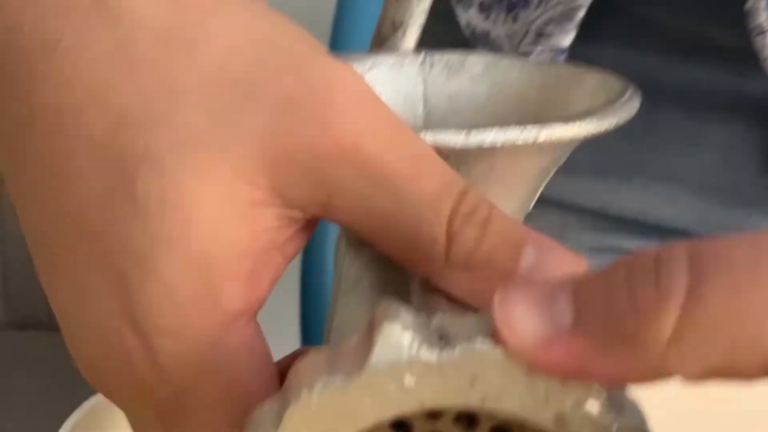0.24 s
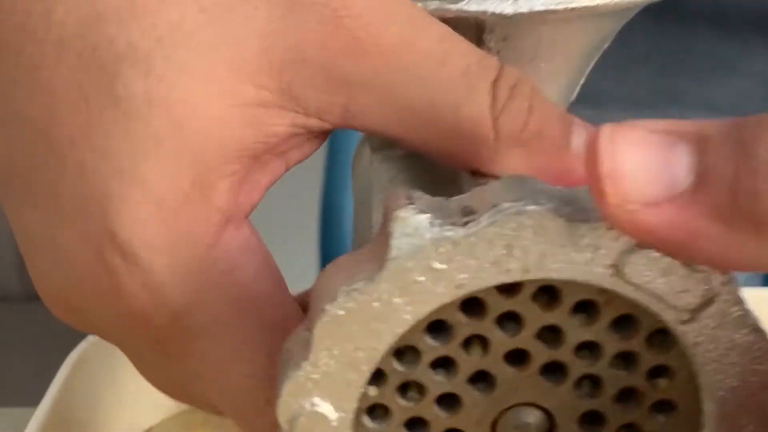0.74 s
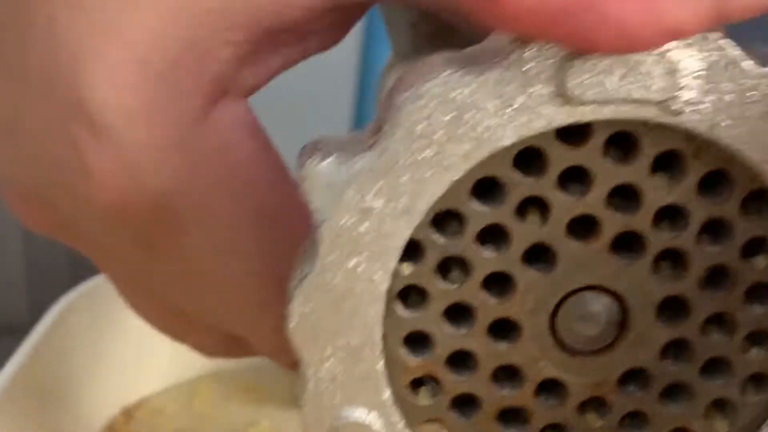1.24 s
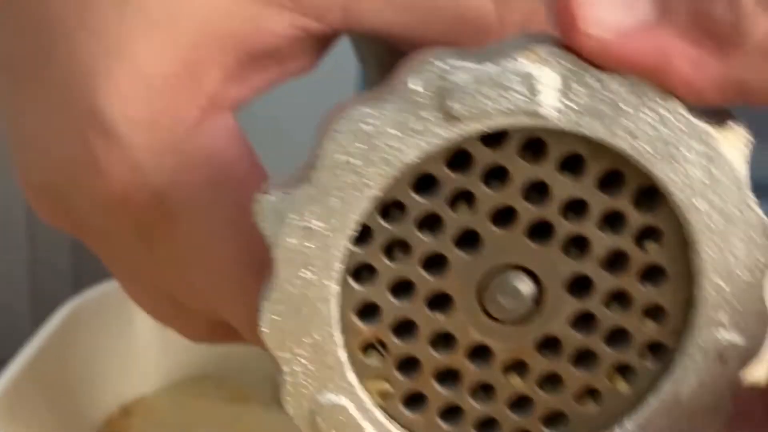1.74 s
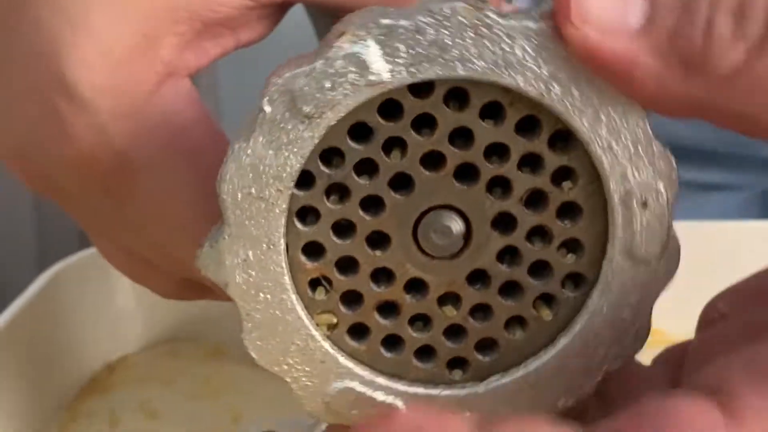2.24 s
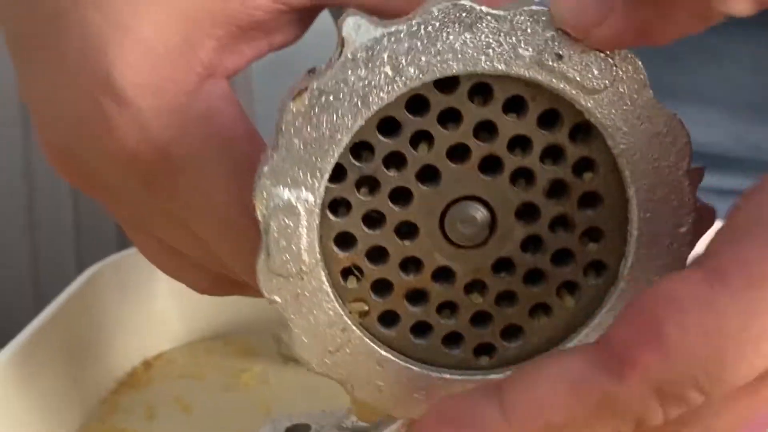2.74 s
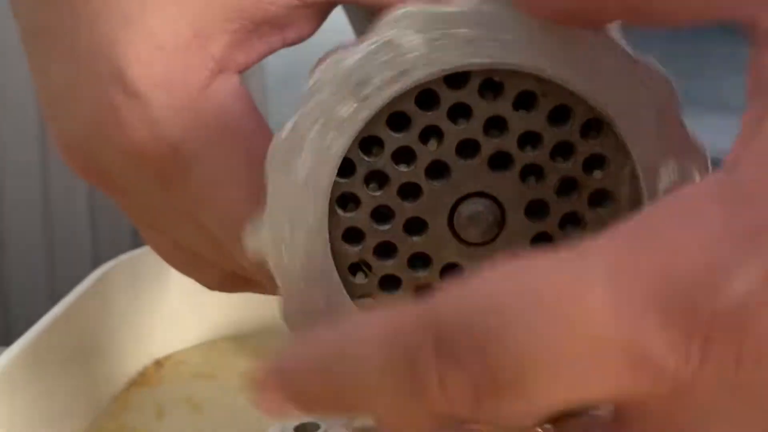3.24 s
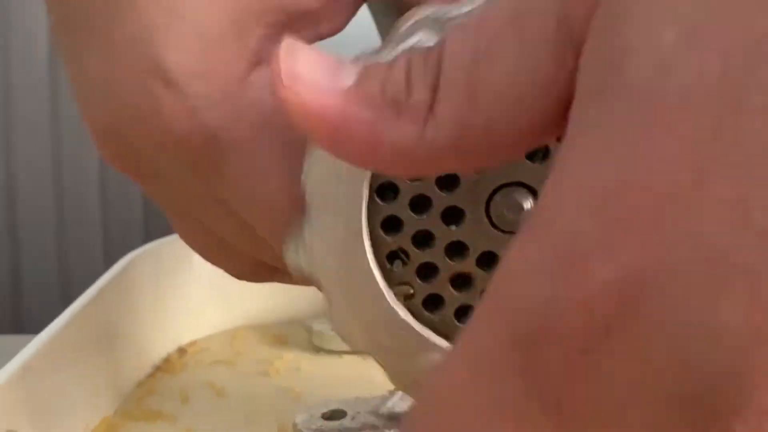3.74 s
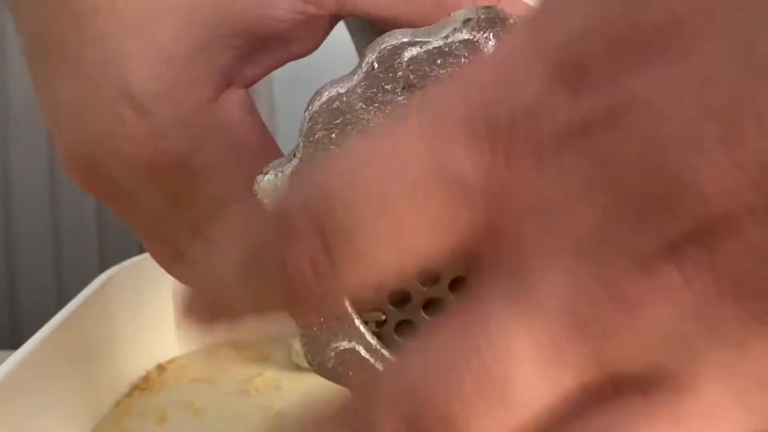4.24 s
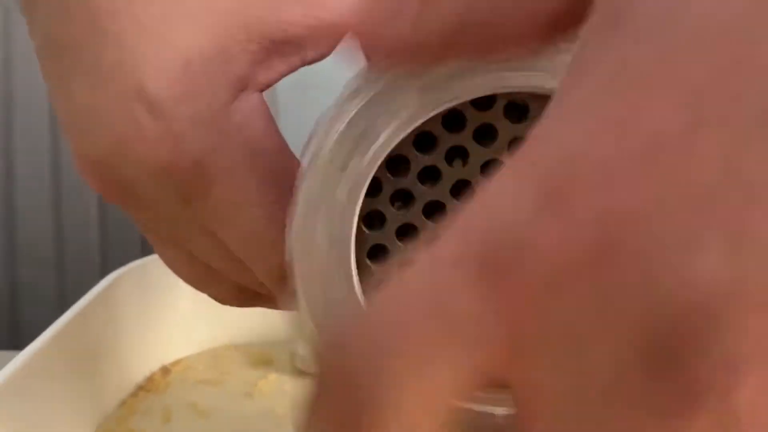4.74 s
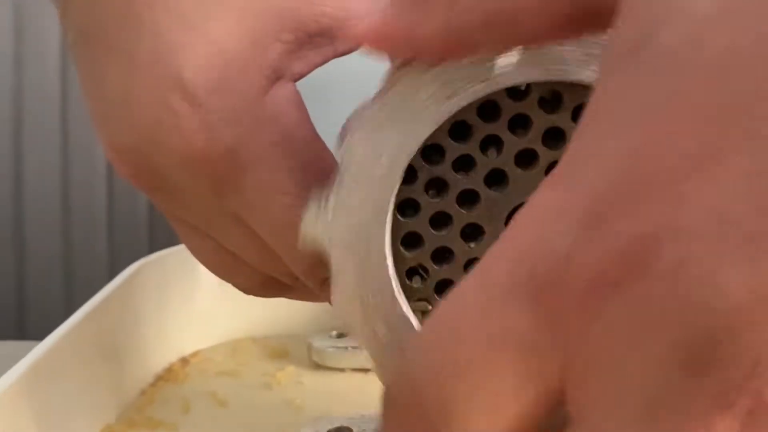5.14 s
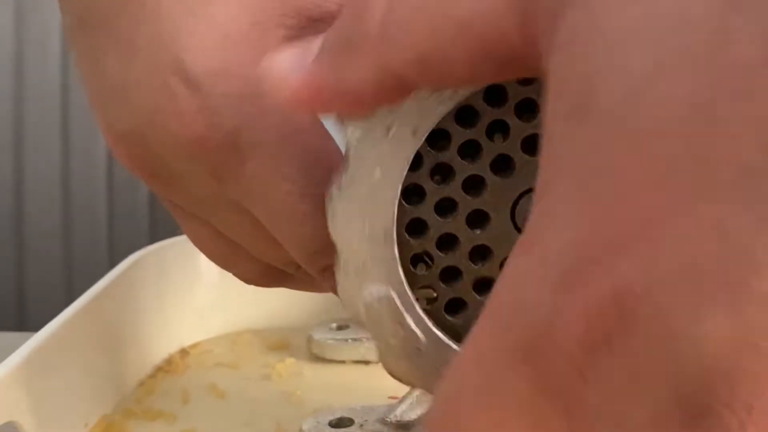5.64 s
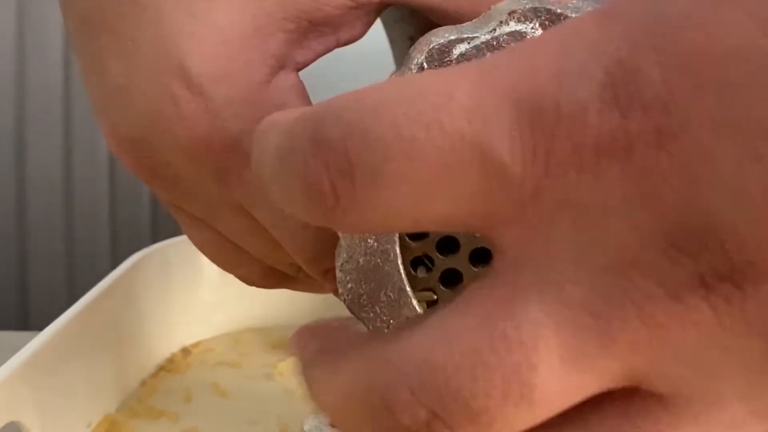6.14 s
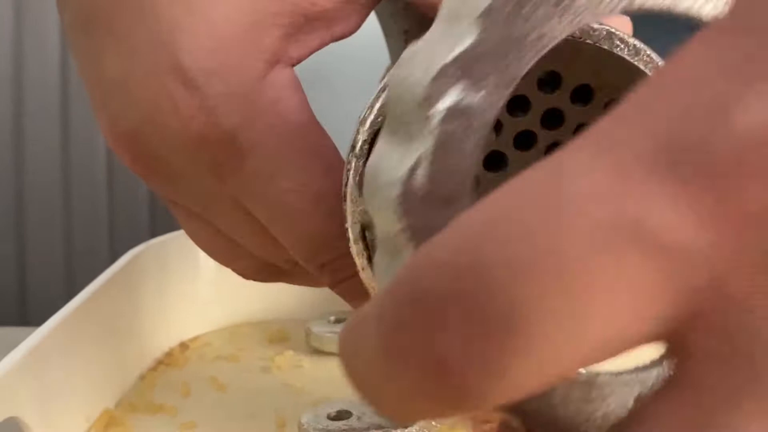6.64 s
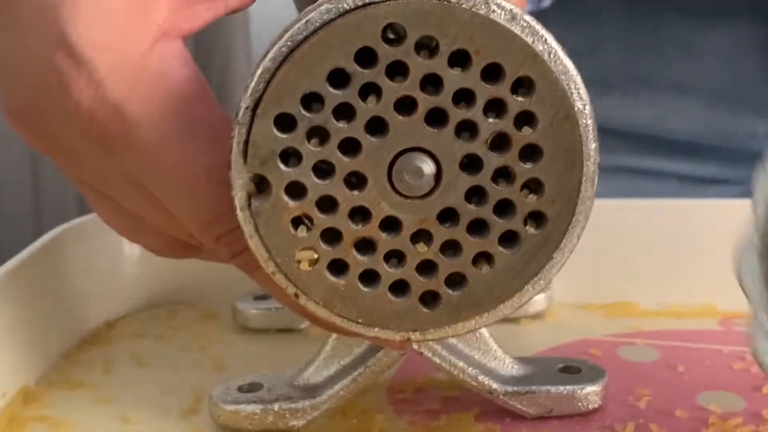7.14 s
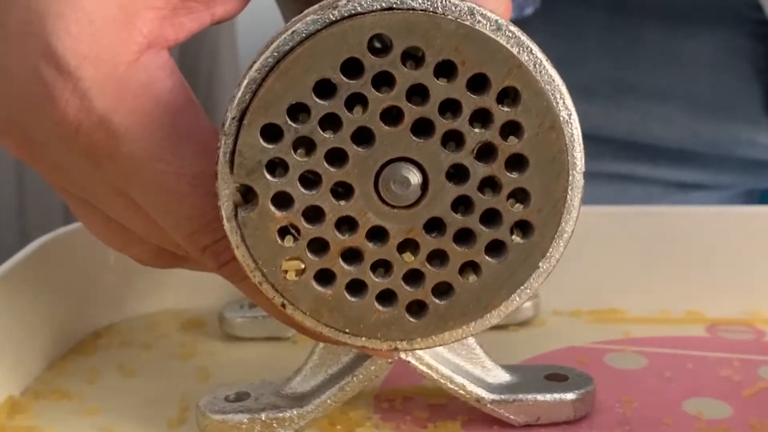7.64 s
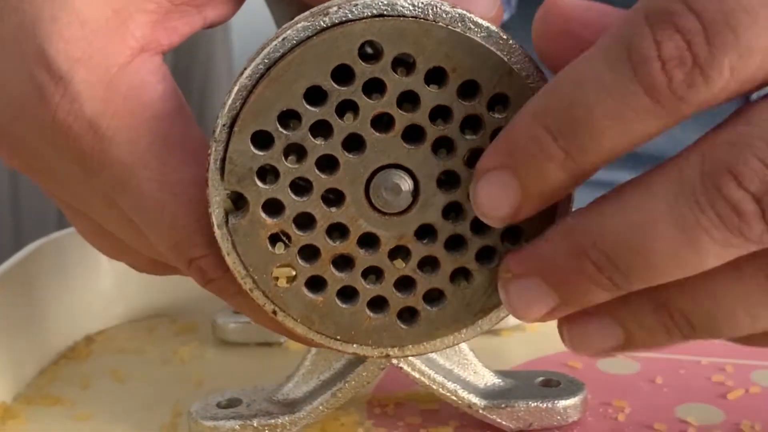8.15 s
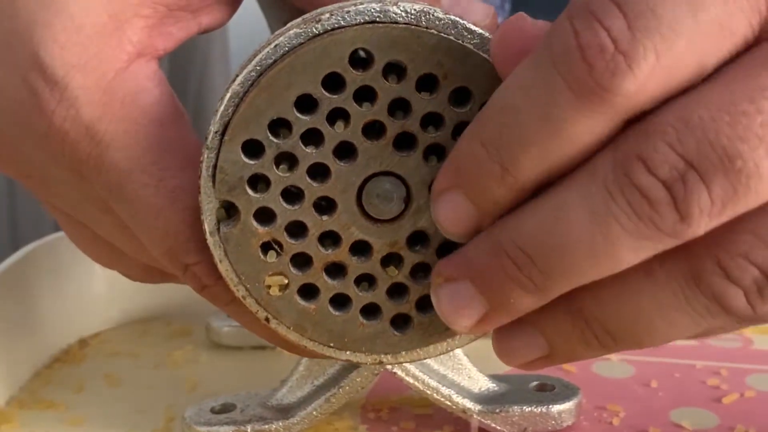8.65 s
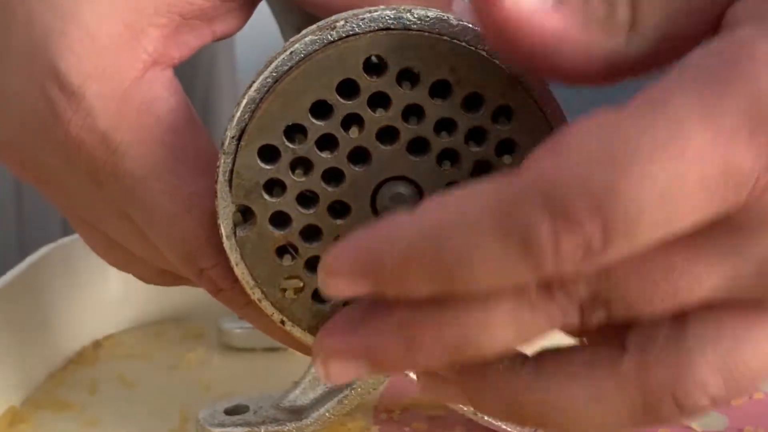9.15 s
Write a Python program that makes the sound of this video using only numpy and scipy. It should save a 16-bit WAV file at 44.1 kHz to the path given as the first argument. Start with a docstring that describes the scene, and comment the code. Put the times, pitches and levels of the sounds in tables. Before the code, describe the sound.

A hand-held cast-metal grinder is taken apart close to the microphone. One strong clank comes early, followed by irregular stick-slip scrapes with a low metallic groan, dusty hiss and crackling dry crumbs. After a last knock and a small run of ticks, the heavy ring drops onto the table in two loud clunks. Soft finger taps end it, with a short indoor room tail.

```python
"""The ring nut of a cast-metal hand meat grinder rasps on its gritty thread, close to the microphone in a
small room: each push of the hand drives stick-slip noise through resonances of thread and rim.
Loose parts knock as struck modes and dull thuds; dry pasta crumbs snap as short noise bursts.
The freed ring is put down on the table with two loud clunks, then fingers tap at the cutting plate.
A room tail and a quiet room tone surround it all."""
import sys
import numpy as np
from scipy import signal
from scipy.fft import rfft, irfft, next_fast_len
from scipy.io import wavfile

SR = 44100
rng = np.random.default_rng(int(sys.argv[2]) if len(sys.argv) > 2 else 0)


def unload_audio(sound):
    """Save the sound as a 16-bit wav file, at the path given as the first command line argument."""
    columns = np.transpose(np.atleast_2d(sound))
    # keep every value between -1 and 1, then stretch to whole-number steps
    steps = np.round(np.clip(columns, -1, 1) * 32767)
    wavfile.write(sys.argv[1], SR, steps.astype(np.int16))


N = 414540
TIME = np.arange(N) / SR
AGE = TIME[:SR // 3]  # time since a blow, s

# modes of the struck cast metal, low and high: f/Hz, level/dB, t60/s
HOUSING_MODES = [(520, -9, .04), (600, -5, .03), (676, 0, .05), (790, -4, .05), (890, -8, .035),
                 (1062, -9, .05), (1200, -14, .04), (1336, -15, .06)]
HOUSING_HIGH_MODES = [(1790, -1, .04), (1930, 0, .05), (2250, 0, .045), (2480, -3, .04), (2680, -8, .04),
                      (2930, -7, .04), (3400, -13, .04), (4560, -16, .06)]
# spectra of the dull clank, the bright clink and the top of a snap: f/Hz, level/dB
CLANK_SPECTRUM = [(120, -25), (250, -11.5), (450, -3.5), (650, -3), (1000, -2.5), (1500, -11.5),
                  (2500, -46.5)]
CLINK_SPECTRUM = [(700, -25.5), (1150, -5.5), (1700, -0.5), (2300, 3), (3200, -9), (4300, -17.5),
                  (6500, -21), (9000, -17), (12000, -27), (15000, -29)]
SNAP_TOP_SPECTRUM = [(4000, -21.5), (7000, -3.5), (9000, 1.5), (10400, 4), (11800, -5.5), (13500, 0),
                     (15300, -8), (16800, -19)]


def amp(db):
    """Decibels to gain."""
    return 10 ** (np.asarray(db) / 20)


def rms_one(x):
    """Scale to rms 1."""
    return x / np.sqrt(np.mean(x ** 2) + 1e-20)


def unit_blow(x):
    """Scale a blow to the energy of 20 ms at rms 1."""
    energy = np.mean(np.sum(x ** 2, axis=-1))
    return x / np.sqrt(energy / (.02 * SR))


def at_hz(points, hz, axis=1):
    """Read one column of a table on a log-frequency axis."""
    table = np.array(points)
    return np.interp(np.log(np.maximum(hz, 1)), np.log(table[:, 0]), table[:, axis])


def drift(rate):
    """Random wander of rms 1 with `rate` fresh values per second, joined by straight lines."""
    knots = rng.standard_normal(N // 40)
    return rms_one(np.interp(TIME * rate, np.arange(len(knots)), knots))


def colour(x, spectrum):
    """Give a sound a spectrum that falls 12 dB per octave beyond its end points."""
    size = next_fast_len(x.shape[-1])
    hz = np.maximum(np.arange(size // 2 + 1) * SR / size, 1)
    low_skirt = np.minimum(1, hz / spectrum[0][0]) ** 2
    high_skirt = np.minimum(1, spectrum[-1][0] / hz) ** 2
    shaped = rfft(x, size) * amp(at_hz(spectrum, hz)) * low_skirt * high_skirt
    return irfft(shaped, size)[..., :x.shape[-1]]


def stereo_noise(size):
    """White noise, most alike on both sides in the bass and unrelated in the treble."""
    # left-right likeness of the room: f/Hz, correlation
    likeness = [(30, 0.5), (150, 1), (400, 0.7), (1000, 0)]
    mid, side = rfft(rng.standard_normal((2, size)))
    alike = np.clip(at_hz(likeness, np.arange(len(mid)) * SR / size), -1, 1)
    return irfft(np.sqrt(1 + alike) * mid + np.sqrt(1 - alike) * side * [[1], [-1]], size)


def resonate(x, peaks, wander_db):
    """Parallel resonances with alternating signs, each swelling and fading by wander_db; rms 1."""
    out = 0
    for k, (hz, width, db) in enumerate(peaks):
        r = np.exp(-np.pi * width / SR)  # pole radius
        poles = [1, -2 * r * np.cos(2 * np.pi * hz / SR), r * r]
        mode = (1 - r * r) * signal.lfilter([1, 0, -1], poles, x)
        out = out + (-1) ** k * amp(db + wander_db * drift(9)) * mode
    return rms_one(out)


def gliding(x, hz, width_hz):
    """One resonance whose centre moves: shift it down to 0 Hz, filter, shift back; rms 1."""
    turn = np.exp(2j * np.pi * np.cumsum(hz) / SR)
    r = np.exp(-np.pi * width_hz / SR)
    return rms_one(np.real(turn * signal.lfilter([1], [1, -2 * r, r * r], x / turn)))


def burst(spectrum, t60, rise):
    """A crowd of unresolved modes: coloured noise that swells and dies after a blow."""
    envelope = amp(-60 * AGE / t60) * (1 - np.exp(-AGE / rise))
    return unit_blow(colour(rng.standard_normal(len(AGE)), spectrum) * envelope)


def ring(modes, scatter_db):
    """Struck modes as decaying sines; each blow weighs them anew."""
    out = 0
    for hz, db, t60 in modes:
        strength = amp(db + scatter_db * rng.standard_normal())
        out = out + strength * amp(-60 * AGE / t60) * np.sin(2 * np.pi * (hz * AGE + rng.random()))
    onset = 1 - np.exp(-AGE * modes[0][0])  # within about a cycle of the first mode
    return unit_blow(out * onset)


def add(track, s, sound):
    """Mix a sound in at a given time."""
    start = int(np.clip(s * SR, 0, N - 1))
    track[start:start + len(sound)] += sound[:N - start]


def friction(per_s, spread_db, contact_s):
    """Tiny slips of uneven size, each a very short puff of noise."""
    slips = (rng.random(N) < per_s / SR) * amp(spread_db * np.minimum(rng.exponential(1, N), 4))
    power = signal.lfilter([1], [1, -np.exp(-1 / (contact_s * SR))], slips ** 2 + 1e-18)
    return rng.standard_normal(N) * np.sqrt(power)


def push(start, rise, hold, slowing):
    """Course of one movement or swell, 0 to 1: it picks up evenly, holds, then dies away exponentially."""
    age = TIME - start
    overdue = np.clip((age - rise - hold) / slowing, 0, 20)
    return np.clip(age / rise, 0, 1) * np.exp(-overdue)


def room_tone():
    """Coloured noise of the place; its level sinks to its lowest at 8.25 s, after the landing, and recovers."""
    # spectrum of the room tone: f/Hz, level/dB
    air_spectrum = [(15, -49), (25, -12), (111, 1), (416, -6.5), (863, -15.5), (1650, -14), (2410, -25),
                    (3620, -25.5), (4370, -21), (7110, -40), (9070, -36), (10700, -39.5), (11600, -65.5),
                    (13600, -36), (16000, -65.5)]
    level_db, dip_db = -56, 11
    lowest_s, sink_s, recover_s = 8.25, .8, .42
    pace_s = np.where(TIME < lowest_s, sink_s, recover_s)
    dip = np.exp(-((TIME - lowest_s) / pace_s) ** 2)
    return amp(level_db - dip_db * dip) * rms_one(colour(stereo_noise(N), air_spectrum))


def knocks():
    """Metal meets metal: the hand-damped housing clunks, one note foremost, and its feet thud on the tray."""
    # loose parts knock on the housing: t/s, clank level/dB, main note f/Hz, thud level/dB, clink level/dB
    knock_list = [(0.111, -39.5, 665, -50, -60), (0.314, -30.5, 895, -49, -40),
                  (0.41, -31.5, 1310, -47, -47), (0.576, -28, 675, -51, -59), (0.69, -19, 770, -25, -22),
                  (0.694, -6.5, 582, -35.5, -60), (0.822, -13, 613, -37.5, -40.5),
                  (0.836, -21, 620, -37, -46), (1.174, -23, 544, -34, -32), (1.336, -22.5, 675, -32, -53),
                  (1.781, -25.5, 567, -29, -45), (1.835, -21, 610, -28, -48),
                  (1.854, -16, 533, -27.5, -30.5), (2.335, -21.5, 686, -58.5, -51),
                  (2.386, -19.5, 500, -45.5, -27), (2.479, -28.5, 1170, -50, -39),
                  (2.511, -26, 593, -38, -35.5), (2.602, -29, 650, -47, -51), (2.869, -20, 596, -36.5, -60),
                  (3.046, -33.5, 635, -53, -37.5), (3.144, -28.5, 670, -53, -34),
                  (3.326, -19.5, 450, -35, -31), (3.622, -16, 595, -52.5, -43),
                  (3.663, -29, 577, -36.5, -33), (4.107, -22, 680, -39, -46),
                  (4.262, -37.5, 660, -59.5, -47), (4.335, -22, 630, -43.5, -46),
                  (4.448, -21.5, 464, -33.5, -49), (4.548, -24, 600, -37.5, -42),
                  (5.001, -30.5, 676, -37.5, -33.5), (5.153, -24.5, 462, -42, -31),
                  (5.353, -25.5, 520, -47.5, -40.5), (5.781, -30.5, 520, -51, -40),
                  (6.344, -13.5, 571, -42.5, -24.5), (8.034, -48, 517, -56, -79),
                  (8.551, -18.5, 747, -40, -37), (8.783, -36, 558, -45, -46), (8.843, -25.5, 540, -37, -51),
                  (8.981, -33.5, 466, -38.5, -57), (9.385, -24, 645, -48.5, -35)]
    # thud on the tray: f/Hz, level/dB
    tray_spectrum = [(36, -17), (58, 0.5), (100, 4.5), (200, 1), (320, -8.5), (500, -12), (900, -25)]
    out = np.zeros(N)
    for s, clank_db, note_hz, thud_db, clink_db in knock_list:
        thud = amp(-2.5) * burst(tray_spectrum, t60=0.19, rise=0.0072)
        clank = amp(-14) * ring([(note_hz, 0, .025)], scatter_db=0)
        clank = clank + amp(-19.5) * ring(HOUSING_MODES, scatter_db=8.0)
        clank = clank + amp(-18.5) * burst(CLANK_SPECTRUM, t60=0.078, rise=0.00052)
        clink = amp(-9.5) * ring(HOUSING_HIGH_MODES, scatter_db=4.0)
        clink = clink + amp(-8.0) * burst(CLINK_SPECTRUM, t60=0.044, rise=0.0013)
        add(out, s, amp(thud_db) * thud + amp(clank_db) * clank + amp(clink_db) * clink)
    return out


def add_snaps(track, events):
    """A brittle break: a bright tick with some body, then a weaker splinter 7 to 60 ms later."""
    # body of a snap: f/Hz, level/dB
    body_spectrum = [(500, -12), (1200, 9), (2200, 2), (4300, 2), (6500, -8), (9000, -26)]
    for s, top_db, body_db in events:
        wait, weaker = rng.random(2)
        body = amp(-12) * burst(body_spectrum, t60=0.044, rise=0.0019)
        top = amp(-15.5) * burst(SNAP_TOP_SPECTRUM, t60=0.024, rise=0.0011)
        tick = amp(body_db) * body + amp(top_db) * top
        add(track, s, tick)
        add(track, s + 0.007 + 0.053 * wait, amp(-11 - 10 * weaker) * tick)


def snaps():
    """Dry crumbs break and edges tick, each a short burst of noise."""
    # crumbs and edges: t/s, top level/dB, body level/dB
    snap_list = [(0.179, -41.5, -45), (0.2157, -25, -40.5), (0.3407, -31.5, -37), (0.6895, -45, -48),
                 (0.845, -31.5, -41.5), (1.0742, -20.5, -25), (1.1384, -27.5, -29), (1.383, -23.5, -34),
                 (1.521, -32, -44), (1.5933, -35, -52), (1.7676, -21.5, -24.5), (1.8048, -29, -24.5),
                 (2.5297, -52, -30.5), (2.9975, -31.5, -39.5), (3.4208, -24, -25), (3.7795, -31.5, -55),
                 (3.8389, -23.5, -35), (3.8741, -21.5, -36.5), (3.9389, -31.5, -42), (4.5448, -22, -32),
                 (4.6294, -28, -40), (4.9207, -44, -45.5), (5.996, -36.5, -41.5), (6.0906, -43, -54),
                 (6.417, -28, -40), (6.4318, -28.5, -40), (6.45, -28.5, -41), (6.541, -31.5, -44.5),
                 (6.702, -37, -42), (7.005, -34, -43.5), (7.3367, -34.5, -52), (7.4026, -25, -27.5),
                 (7.5534, -15.5, -15), (7.7363, -37, -49.5), (7.78, -32.5, -44), (8.2322, -36, -49.5),
                 (8.3456, -42, -54), (8.745, -33, -41), (8.785, -33, -52), (9.2488, -34.5, -45),
                 (9.3558, -36, -50)]
    out = np.zeros(N)
    add_snaps(out, snap_list)
    return out


def turning():
    """Drag, grit, hiss and rumble follow the speed of each push; the strongest drag sets the groan's pitch."""
    # pushes of the hand on the ring: t/s, speeding up/s, held/s, slowing/s, drag of the thread level/dB,
    # grit level/dB, fine hiss level/dB, rumble of the body level/dB, groan f/Hz
    push_list = [(0.38, 0.023, 0.017, 0.026, -51, -42.5, -56.5, -59, 780),
                 (0.94, 0.056, 0.11, .04, -51.5, -48.5, -91, -49.5, 613),
                 (1.08, 0.074, 0.03, 0.056, -39, -39.5, -52, -42, 607),
                 (1.625, 0.0093, 0.051, 0.073, -47.5, -50.5, -65, -46, 606),
                 (1.765, 0.0062, 0.07, 0.045, -35.5, -44, -79, -37, 564),
                 (2.065, 0.022, 0.014, 0.022, -43.5, -61.5, -112, -57, 530),
                 (2.19, 0.032, 0.055, 0.034, -42, -53, -90, -45.5, 647),
                 (2.26, 0.11, 0.016, 0.035, -32, -29, -48, -37.5, 644),
                 (2.73, 0.03, .05, 0.057, -39, -45, -70, -44.5, 547),
                 (2.8, 0.047, 0.018, 0.026, -26.5, -26.5, -54.5, -38.5, 605),
                 (3.13, 0.16, 0.075, 0.08, -32.5, -33.5, -52.5, -35.5, 600),
                 (3.4, 0.017, .02, 0.074, -48.5, -39, -35.5, -49, 567),
                 (3.5, 0.015, 0.015, 0.18, -50, -39.5, -33.5, -54, 560),
                 (3.58, 0.033, 0.048, 0.059, -27.5, -25.5, -52.5, -44.5, 549),
                 (3.955, 0.029, 0.11, 0.03, -31, -31.5, -40, -41.5, 580),
                 (4.32, 0.047, .035, 0.064, -28.5, -28, -38, -37.5, 548),
                 (4.61, 0.077, 0.077, 0.042, -33.5, -33.5, -40, -40, 551),
                 (4.985, 0.047, 0.13, 0.032, -41.5, -41, -66, -43.5, 487),
                 (5.225, 0.011, 0.012, 0.01, -40.5, -54, -102, -42, 520),
                 (5.372, .04, 0.097, 0.081, -35, -38.5, -61, -37.5, 547),
                 (5.52, 0.065, 0.1, 0.089, -35.5, -43, -56.5, -40, 575),
                 (6.196, .016, 0.012, 0.029, -24, -37, -83, -37.5, 579),
                 (6.24, 0.062, 0.036, 0.015, -31, -44, -62, -32.5, 600)]
    # drag, grit, hiss and rumble each grow with the speed of the ring to this power
    powers = np.array([[1.11], [1.51], [3.1], [.7]])
    groan_sag_hz_per_s = 250  # the groan sinks in the course of a push
    rumble_lag_s = .02  # the body rocks a moment after the push
    gains, groan_hz = np.zeros((len(powers), N)), np.full(N, float(push_list[0][-1]))
    for start, rise, hold, slowing, *levels_db, hz in push_list:
        span = slice(int(start * SR), int(start * SR) + SR)
        own = amp(levels_db)[:, None] * push(start, rise, hold, slowing)[span] ** powers
        pitch = hz - groan_sag_hz_per_s * (TIME[span] - start - rise)
        groan_hz[span] = np.where(own[0] > gains[0, span], pitch, groan_hz[span])
        gains[:, span] = np.hypot(gains[:, span], own)
    drag, grit, hiss, shake = gains
    return drag, grit, hiss, np.interp(TIME - rumble_lag_s, TIME, shake), groan_hz


def crackle(hiss):
    """Crumbs too small to hear one by one are crushed while the dust is on the move."""
    crumbs = friction(per_s=90, spread_db=3, contact_s=.0008)
    return amp(-26.5) * np.sqrt(hiss) * rms_one(colour(crumbs, SNAP_TOP_SPECTRUM))


def thread():
    """The ring sticks and slips: the thread groans, the rim rasps and catches on grit, fine dust hisses."""
    # resonances of the rubbed thread and of the rim: f/Hz, width/Hz, level/dB
    thread_peaks = [(480, 68.7, -0.5), (597.4, 148, 2), (649.4, 116, 2.5), (912, 84, -11.5),
                    (1230, 87, -13.5)]
    rim_peaks = [(1200, 90, -3), (1400, 110, -5), (1860, 80, 1), (2090, 130, -2), (2380, 90, -3),
                 (2630, 170, -3), (3000, 110, -4), (3440, 220, -4), (3790, 130, -10), (4480, 160, -7),
                 (5050, 220, -15), (6050, 450, -14)]
    # spectra of grit, dust hiss and body rumble: f/Hz, level/dB
    grit_spectrum = [(600, -2.5), (950, -4), (1600, 9.5), (2400, 9.5), (4000, -3), (6000, -10.5), (7200, 0),
                     (9000, -36.5)]
    hiss_spectrum = [(4000, -34), (6200, -4), (7200, -13), (8800, 1.5), (10500, 2.5), (11800, -15),
                     (13700, -5.5), (15200, -32.5), (16500, -22.5)]
    rumble_spectrum = [(40, -12), (70, 1), (110, -3), (200, -0.5), (320, 0.5), (450, -18), (700, -33.5)]
    drag, grit, hiss, shake, groan_hz = turning()
    coarse = friction(per_s=500, spread_db=2.0, contact_s=0.0011)
    catches = friction(per_s=90, spread_db=3.5, contact_s=.002)
    fine = friction(per_s=1400, spread_db=0.0, contact_s=0.0022) + amp(1) * catches
    groan = amp(0.5) * resonate(coarse, thread_peaks, wander_db=1.0)
    groan = groan + amp(-2.0) * gliding(coarse, groan_hz, width_hz=91)
    rasp = resonate(fine, rim_peaks, wander_db=4.5)
    rasp = rasp + amp(-6.5) * rms_one(colour(fine, grit_spectrum))
    dust = rms_one(colour(fine, hiss_spectrum)) * (amp(-1.5) * hiss + amp(-20) * grit)
    rumble = amp(-4.0) * shake * rms_one(colour(coarse, rumble_spectrum))
    judder = amp(1.9 * drift(90) - 2.5)
    return judder * (drag * groan + grit * rasp + dust + rumble) + crackle(hiss)


def slides_and_faint_bands():
    """Slides, and late faint bands of background noise that swell and fade: grainy noise in a gliding band."""
    # slides, then from 8.45 s faint background bands:
    # t/s, rise/s, held/s, fall/s, level/dB, centre f/Hz, glide/(Hz/s), width/Hz
    band_list = [(0.39, 0.022, 0.0065, 0.018, -38, 1230, 304, 500),
                 (0.86, .2, 0.045, .03, -55.5, 3640, 4996, 1360),
                 (0.95, .2, .05, 0.037, -41, 1293, -300, 376),
                 (3.17, 0.1, 0.13, 0.088, -40.5, 2870, 3300, 1320),
                 (6.335, 0.0042, 0.0105, 0.036, -31.5, 1332, 309, 170.6),
                 (8.45, .11, 0.29, .9, -61, 1403, 111.5, 700), (8.6, 0.21, 0.38, .9, -75, 4400, 50, 454)]
    out = 0
    for start, rise, hold, slowing, db, hz, glide, width_hz in band_list:
        grain = friction(per_s=920, spread_db=1.5, contact_s=.0008)
        centre_hz = hz + glide * np.clip(TIME - start, 0, rise + hold + slowing)
        out = out + amp(db) * push(start, rise, hold, slowing) * gliding(grain, centre_hz, width_hz)
    return out


def release_ticks():
    """The ring comes off with an even run of ticks, the first one strongest."""
    start_s, gap_s, count = 6.923, 0.0277, 7
    top_db, body_db = -28.5, -42  # first tick
    losses_db = 4 * np.log2(1 + np.arange(count))  # 4 dB each time the count doubles
    out = np.zeros(N)
    add_snaps(out, [(start_s + k * gap_s, top_db - loss, body_db - loss) for k, loss in enumerate(losses_db)])
    return out


def drone():
    """A faint low drone swells briefly before the landing: noise through two narrow resonances."""
    # resonances of the drone: f/Hz, width/Hz, level/dB
    drone_peaks = [(138.8, 20, -9.5), (213, 11, -1)]
    swell = push(7.23, rise=.045, hold=.11, slowing=.03)
    return amp(-47) * swell * resonate(stereo_noise(N), drone_peaks, wander_db=0)


def landing():
    """The heavy ring hits the table top, then drops flat and rocks to rest."""
    # blows on the table: t/s, clank level/dB, thud level/dB, clink level/dB
    blow_list = [(7.406, 0.5, -15, -18.5), (7.409, -8.5, -28, -33), (7.423, -17, -17, -31),
                 (7.557, -2.5, -23.5, -17), (7.566, -6.5, -12.5, -21), (7.578, -1, -23.5, -19),
                 (7.59, -4.5, -24, -25)]
    # thud of the table top: f/Hz, level/dB
    table_spectrum = [(30, -34), (70, -21), (120, -1.5), (190, 10), (320, 7), (480, 3.5), (900, -25)]
    out = np.zeros(N)
    for s, clank_db, thud_db, clink_db in blow_list:
        thud = amp(-6.0) * burst(table_spectrum, t60=0.038, rise=0.0017)
        clank = amp(-14.0) * ring(HOUSING_MODES, scatter_db=4.0)
        clank = clank + amp(-14) * burst(CLANK_SPECTRUM, t60=0.09, rise=0.0013)
        clink = amp(-7) * ring(HOUSING_HIGH_MODES, scatter_db=8)
        clink = clink + amp(-4.5) * burst(CLINK_SPECTRUM, t60=0.12, rise=0.001)
        add(out, s, amp(thud_db) * thud + amp(clank_db) * clank + amp(clink_db) * clink)
    return out


def plate_ping():
    """The steel cutting plate pings in its own high modes."""
    # pings: t/s, level/dB
    ping_list = [(8.6602, -41.5)]
    # modes of the plate: f/Hz, level/dB, t60/s
    plate_modes = [(9000, -14, 0.057), (8960, -9, 0.047), (10800, 8, 0.037), (12920, -9, 0.068),
                   (14830, -15, 0.078)]
    out = np.zeros(N)
    for s, level_db in ping_list:
        add(out, s, amp(level_db) * ring(plate_modes, scatter_db=6.0))
    return out


def near_field(x, t60, above_hz, glance_db):
    """Sound reaches two ports out of step; highs also glance off hands and metal a moment later."""
    # the two microphone ports: f/Hz, phase by which the left leads/rad
    port_phase = [(60, 0), (250, 0.77), (600, 0.22), (1100, 1.99), (2200, 1.53), (3500, 1.41), (4500, 0.5),
                  (5600, -0.5), (7200, -3), (9000, -7), (11800, -9.5), (13700, -13), (16000, -14.5)]
    # left minus right: f/Hz, level/dB
    side_balance = [(60, 0), (200, -.5), (380, 2), (650, 4.8), (1200, .5), (4400, -.6), (15000, 0)]
    age = TIME[:SR // 20]
    glances = rng.standard_normal((2, len(age))) * amp(-60 * age / t60) * (age > .001)
    glances /= np.sqrt(np.sum(glances ** 2, axis=1, keepdims=True))
    hz = np.arange(N // 2 + 1) * SR / N
    high = hz ** 2 / (hz ** 2 + above_hz ** 2)
    straight = np.exp(-1j * at_hz(port_phase, hz) * np.array([[0], [1]]))
    paths = straight + amp(glance_db) * high * rfft(glances, N)
    side_gain = amp(at_hz(side_balance, hz) / 2 * np.array([[1], [-1]]))
    return irfft(rfft(x) * paths * side_gain, N)


def room(x, build_s):
    """A diffuse tail of noise that builds up and dies at its own pace in each octave or so."""
    # the tail of the room: f/Hz, t60/s, level/dB
    tail_table = [(60, 0.64, -4.5), (150, 0.96, -10.5), (342, 0.68, -12.5), (690, 0.48, -18.5),
                  (1370, 0.64, -16), (2800, 0.53, -19.5), (4200, 0.6, -13), (5900, 0.55, -14),
                  (10000, 0.17, -18.5), (16000, 0.22, -19)]
    age, tail = TIME[:SR], 0
    edges = np.geomspace(35, 18000, 10)
    for low, high in zip(edges, edges[1:]):
        hz = np.sqrt(low * high)
        band_filter = signal.butter(2, [low, high], "band", fs=SR, output="sos")
        band = signal.sosfilt(band_filter, stereo_noise(SR))
        decay = amp(-60 * age / at_hz(tail_table, hz)) * (1 - np.exp(-age / build_s))
        tail = tail + amp(at_hz(tail_table, hz, axis=2)) * band * decay / np.sqrt(np.sum(decay ** 2))
    return signal.fftconvolve(x, tail, axes=1)[:, :N]


def scene():
    """The grinder sits close to the microphone, each part with its own glances; the room answers all around."""
    ticking = snaps() + release_ticks() + plate_ping()
    parts = knocks(), ticking, thread() + slides_and_faint_bands(), landing()
    direct = sum(near_field(part, t60=.03, above_hz=1800, glance_db=-7.5) for part in parts)
    return direct + room(direct, build_s=.008) + room_tone() + drone()


def record(dry):
    """The loudest peaks are rounded and the top is cut at 16.3 kHz."""
    rounded = 1.164 * np.tanh(dry / 1.071)
    return signal.sosfilt(signal.ellip(10, .2, 80, 16300, fs=SR, output="sos"), rounded)


dry = scene()
out = record(dry)
unload_audio(out)
```